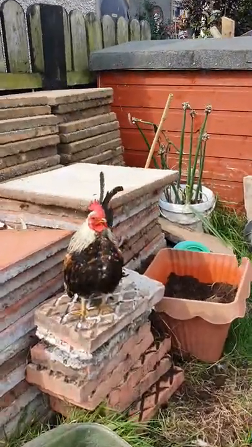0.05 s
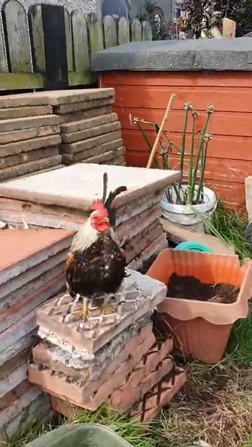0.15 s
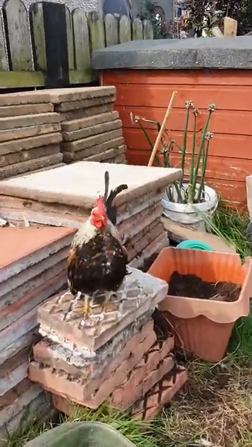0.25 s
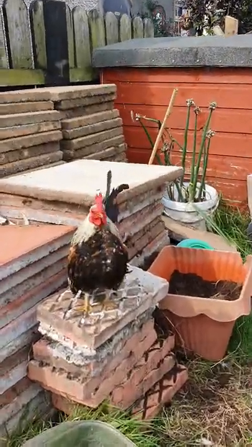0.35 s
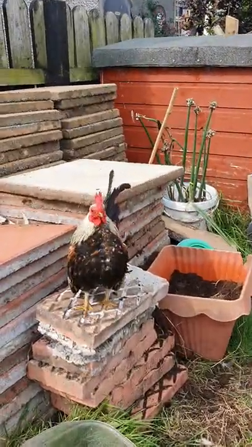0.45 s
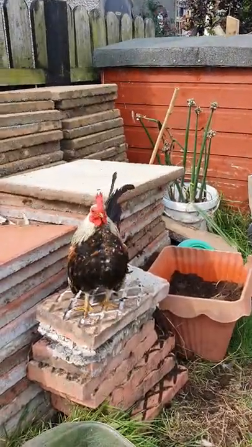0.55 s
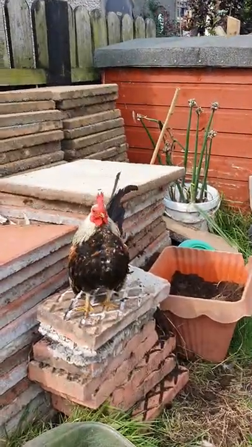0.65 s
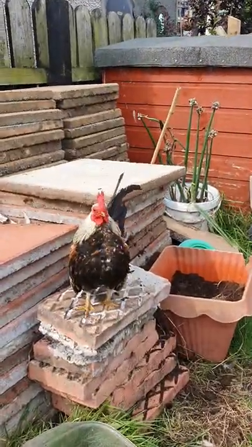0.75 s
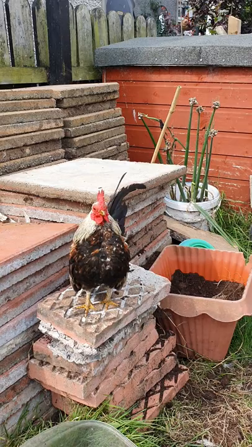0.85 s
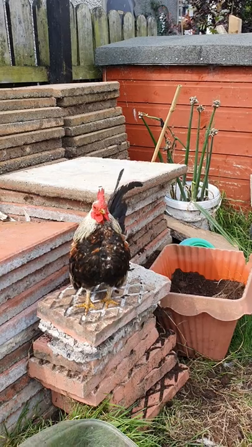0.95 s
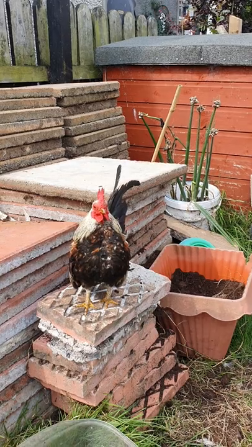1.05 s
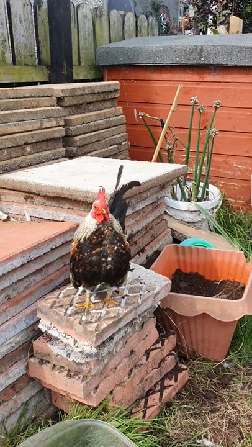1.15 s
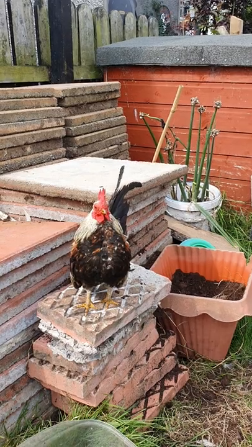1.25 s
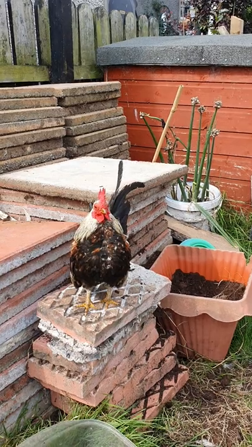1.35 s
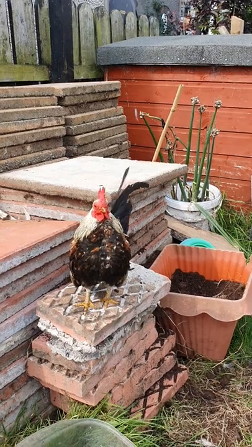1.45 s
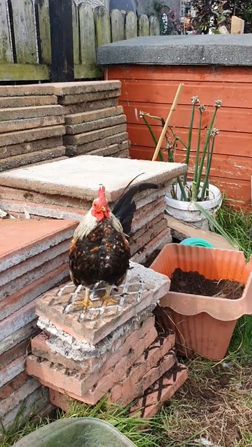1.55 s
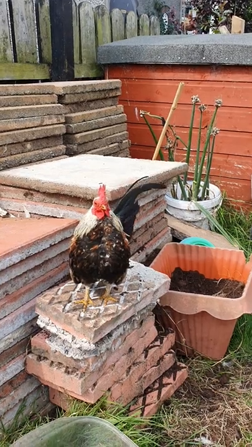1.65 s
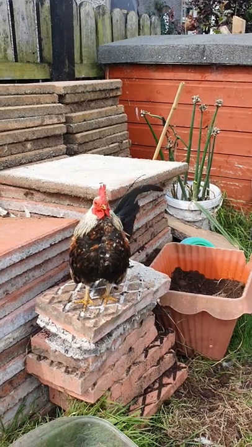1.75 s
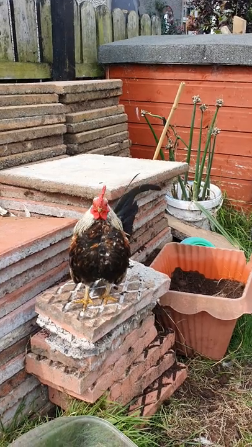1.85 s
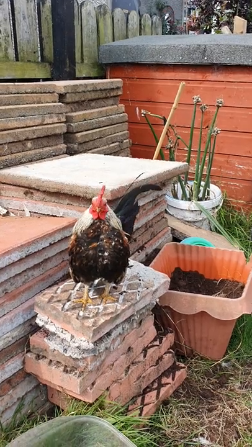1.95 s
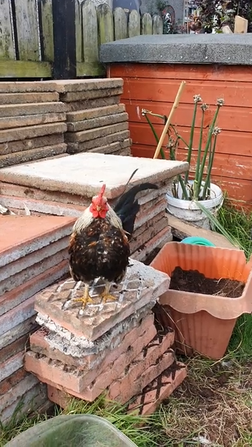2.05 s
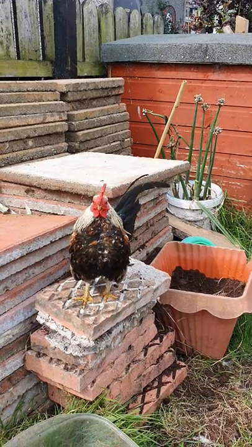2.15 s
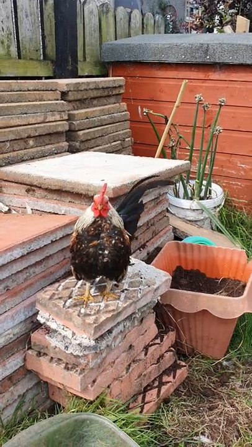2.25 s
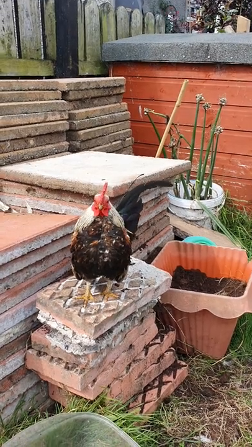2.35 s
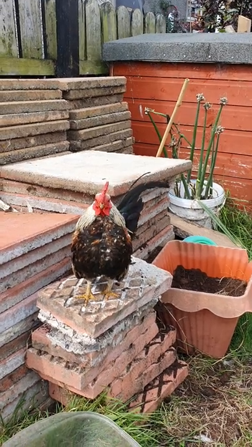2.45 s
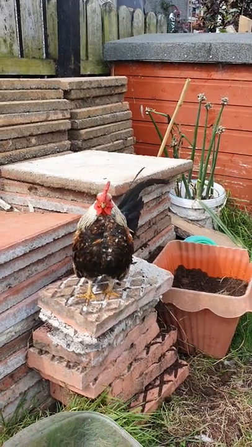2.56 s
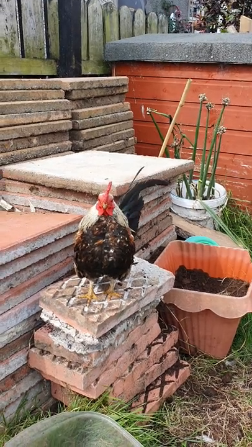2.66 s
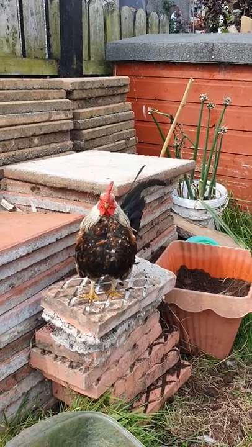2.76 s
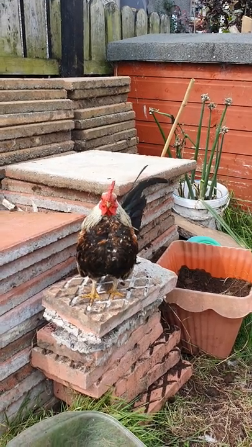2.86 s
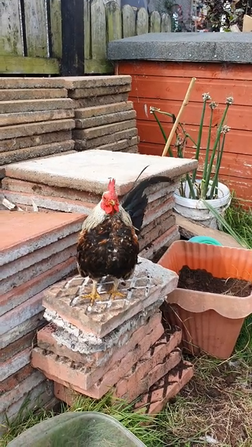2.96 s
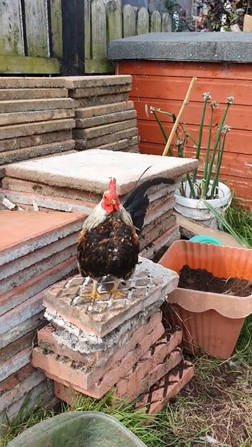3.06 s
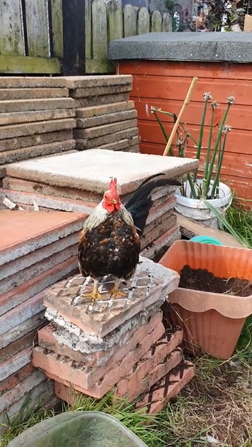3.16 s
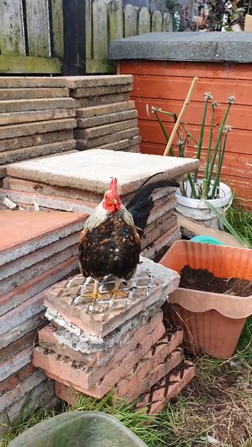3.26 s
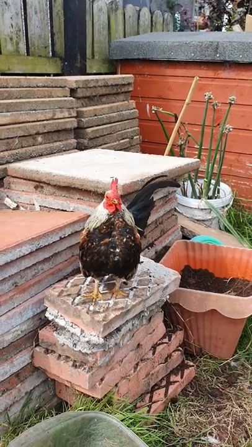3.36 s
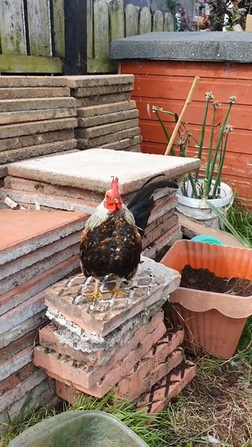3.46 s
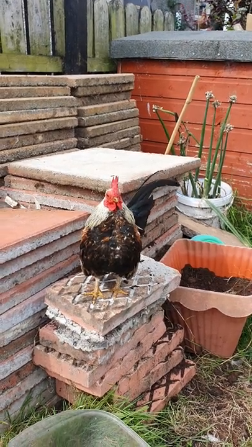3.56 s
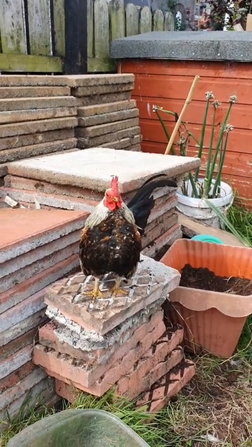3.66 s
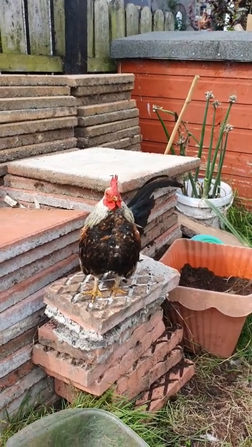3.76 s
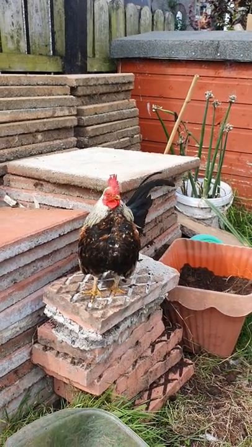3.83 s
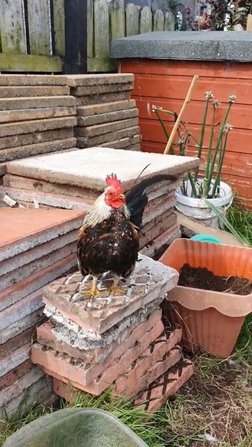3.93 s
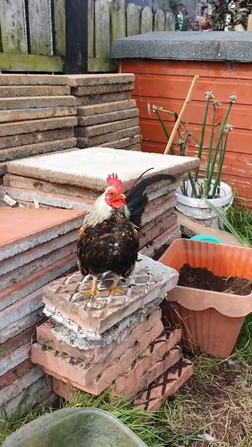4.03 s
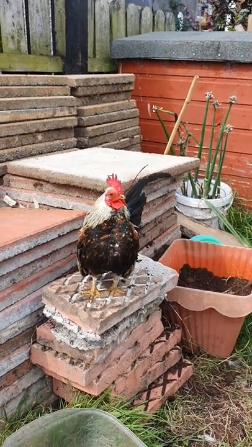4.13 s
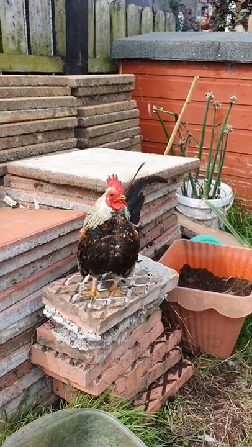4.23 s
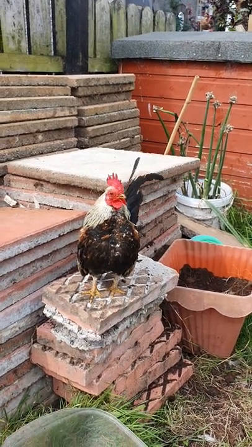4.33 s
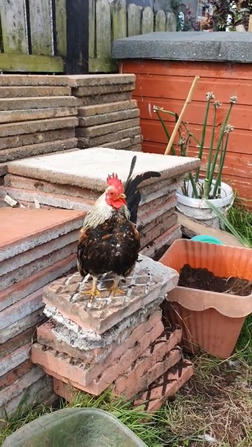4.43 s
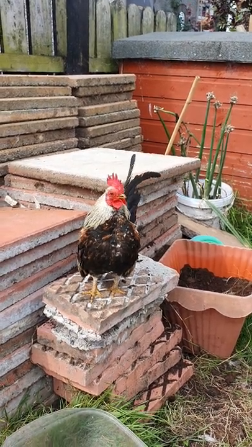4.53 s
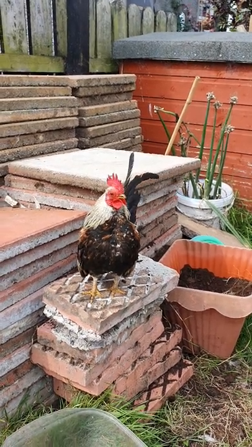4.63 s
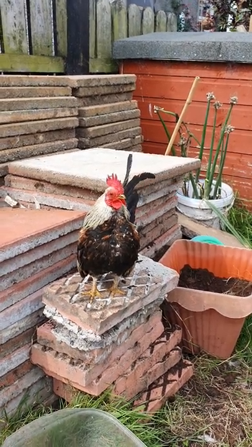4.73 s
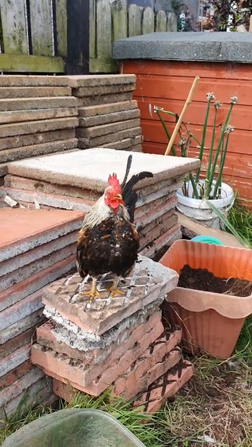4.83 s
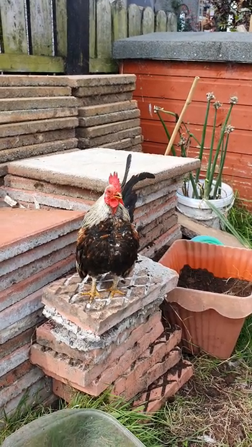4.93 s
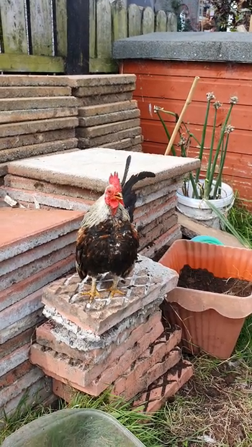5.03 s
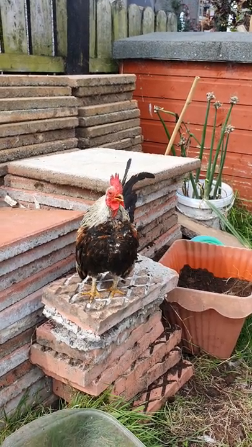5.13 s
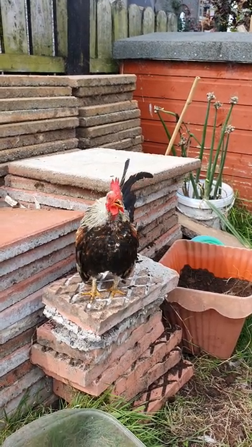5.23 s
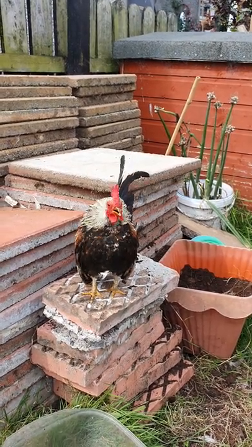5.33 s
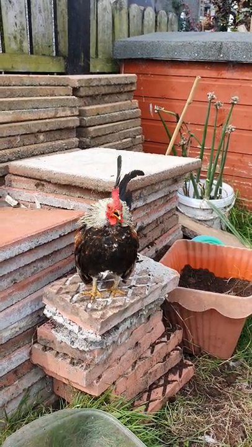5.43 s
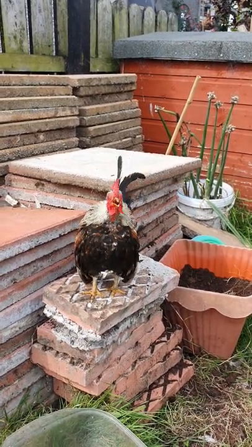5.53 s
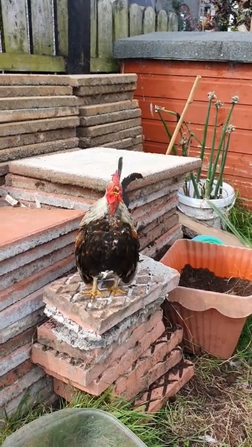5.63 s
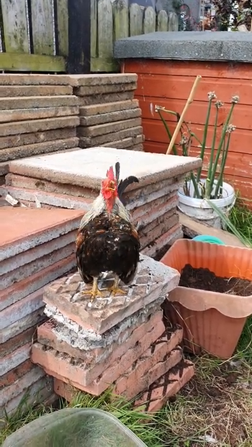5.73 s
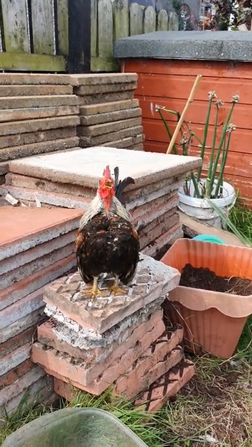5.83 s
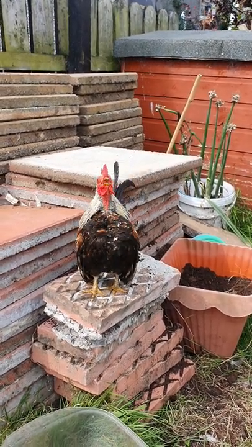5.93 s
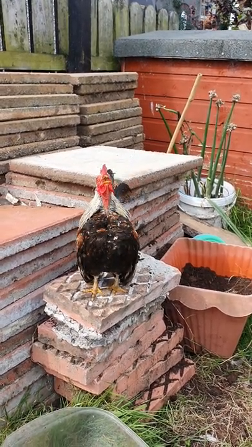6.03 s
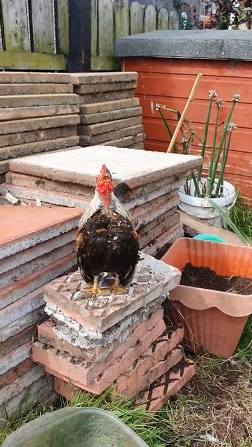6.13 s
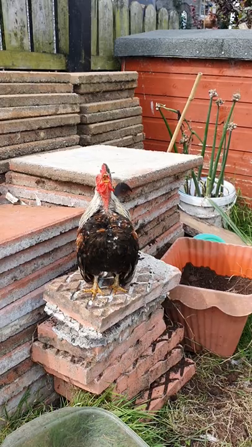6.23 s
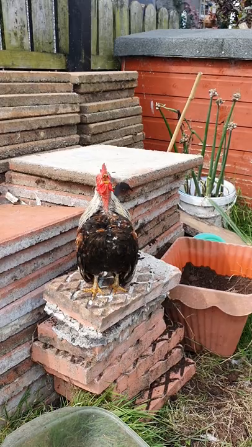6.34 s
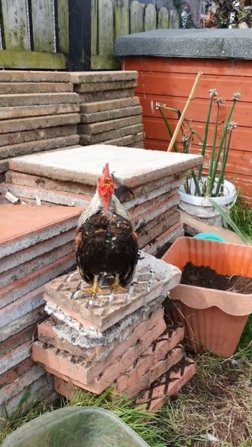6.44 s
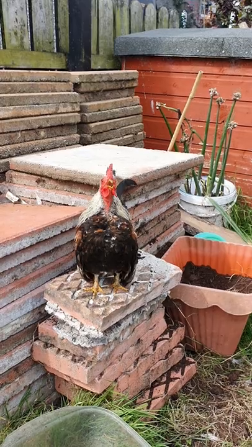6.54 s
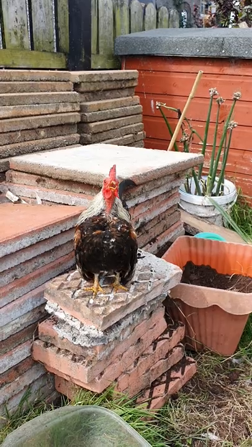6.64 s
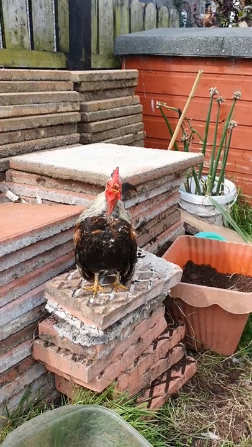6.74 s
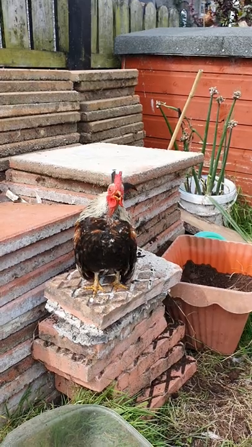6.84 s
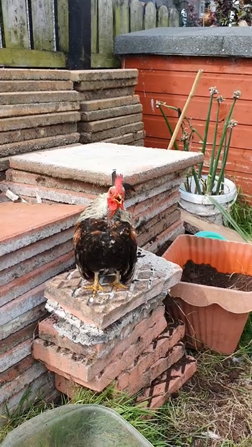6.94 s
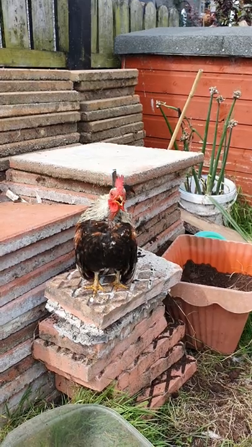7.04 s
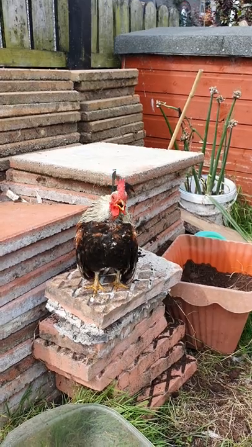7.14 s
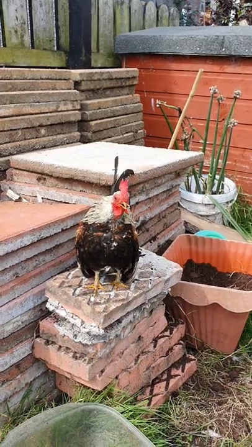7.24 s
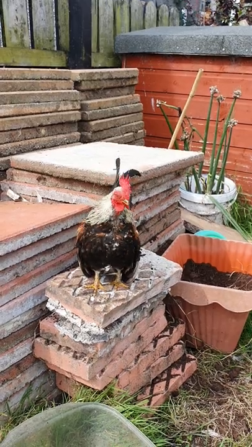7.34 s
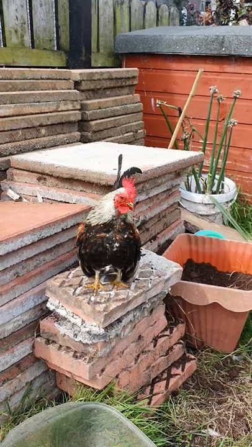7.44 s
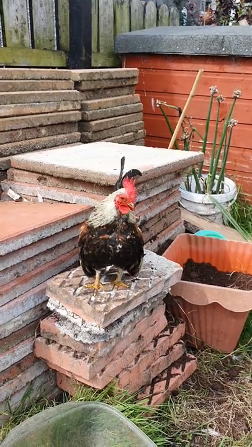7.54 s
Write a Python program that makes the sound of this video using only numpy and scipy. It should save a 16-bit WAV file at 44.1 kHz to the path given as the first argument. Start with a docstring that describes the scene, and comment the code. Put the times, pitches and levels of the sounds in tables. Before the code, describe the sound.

A bantam rooster crows at a distance, then another crows much louder and harsher close by, amid low clucking rattles, faint birdsong and garden wind.

```python
"""Two roosters in a windy garden

Two bantam roosters crow in a fenced garden, first one farther off, then one close by: pulses of the
syrinx ring a windpipe and break up into throbs and breath. A bird rattles in ringing pulses and ticks in
noise snaps; far songbirds whistle as fluttering tones. Traffic, leaves and wind are coloured stereo noise."""
import sys
import numpy as np
from scipy import signal
from scipy.fft import rfft, irfft, next_fast_len
from scipy.io import wavfile
from scipy.ndimage import uniform_filter1d

SR = 44100
rng = np.random.default_rng(int(sys.argv[2]) if len(sys.argv) > 2 else 0)


def to_wav(s):
    """Save 16-bit WAV."""
    ch = np.atleast_2d(s).T  # columns
    pcm = np.round(np.clip(ch, -1, 1) * 32767)  # PCM
    wavfile.write(sys.argv[1], SR, pcm.astype(np.int16))


N = 334534

# Effort of the near rooster, one list per syllable.
# Each row: time in seconds, level of the throat band in dB, fundamental against it in dB.
NEAR_CROW = [
    [(5.615, -96, 17), (5.625, -34, -12), (5.633, -20.5, -14), (5.677, -16, -7.5), (5.713, -12, -15),
     (5.8, -16, -12.5)],
    [(5.8, -12, -9), (5.806, -19.5, -4), (5.856, -16.5, 1), (5.904, -17, 0), (5.928, -19, -6),
     (5.944, -33, -7), (5.99, -48, -9)],
    [(6.015, -66, -0.5), (6.029, -26.5, 1.5), (6.043, -17.5, 0), (6.141, -18.5, -7.5), (6.172, -19, -0.5)],
    [(6.172, -19.5, -2), (6.236, -20, 1), (6.244, -17, -6.5), (6.36, -18.5, 1.5), (6.376, -16, -5),
     (6.454, -23, -1.5), (6.466, -18.5, -6.5), (6.54, -29.5, 1), (6.586, -55.5, 0), (6.62, -60, 3)],
    [(6.779, -38, -10.5), (6.805, -24.5, -8), (6.847, -20.5, -11), (6.975, -28, -8.5), (7.077, -24, -12.5),
     (7.141, -27, -4.5), (7.259, -32, -9.5), (7.283, -41, -7.5), (7.299, -58, -8), (7.31, -54, -14)],
]
# How alike left and right are in the traffic and leaves. Each row: frequency in Hz, likeness from -1 to 1.
LIKENESS = [(60, 0.96), (130, 0.78), (290, 1), (640, 0.68), (1410, -0.22), (3100, -0.094), (6820, 0.048),
            (15000, -0.42)]


def from_db(db):
    """Decibels to gain."""
    return 10 ** (np.asarray(db) / 20)


def rms_one(x):
    """Scale to rms 1."""
    return x / np.sqrt(np.mean(x ** 2) + 1e-20)


def in_time(rows, t):
    """Columns of a curve table at times t."""
    s, *columns = np.transpose(rows)
    return [np.interp(t, s, c) for c in columns]


def span(start_s, end_s):
    """First sample and sample times of a stretch."""
    first, last = round(start_s * SR), min(round(end_s * SR), N)
    return first, np.arange(first, last) / SR


def at_hz(points, hz):
    """Read a spectrum on a log-frequency axis."""
    f, v = np.transpose(points)
    return np.interp(np.log(np.maximum(hz, 1)), np.log(f), v)


def colour(x, spectrum):
    """Filter by a (Hz, dB) table."""
    n = next_fast_len(x.shape[-1] + 2000)
    gain = from_db(at_hz(spectrum, np.fft.rfftfreq(n, 1 / SR)))
    return irfft(rfft(x, n) * gain, n)[..., :x.shape[-1]]


def wobble(size, rate_hz):
    """Random wandering, noise low-passed at rate_hz; spread 1."""
    sos = signal.butter(2, rate_hz, fs=SR, output="sos")
    settle = 4000
    return rms_one(signal.sosfilt(sos, rng.standard_normal(size + settle))[settle:])


def evened(x, band_hz):
    """One band of x with its slow level held at rms 1."""
    band = signal.sosfiltfilt(signal.butter(4, band_hz, "band", fs=SR, output="sos"), x)
    power = uniform_filter1d(uniform_filter1d(band ** 2, size=1000), size=1000)
    return band / np.sqrt(power + 1e-12)


def shaped(t, first_db, last_db, attack, release, edge_db):
    """Level in dB of one call: attack, a slope from first to last, release."""
    release = min(release, t[-1] - t[0] - attack)
    corners = [t[0], t[0] + attack, t[-1] - release, t[-1]]
    return np.interp(t, corners, [first_db + edge_db, first_db, last_db, last_db + edge_db])


def crow(melody, syllables, harsh, overtones, throat, shrill, balance, jitter, breath_db):
    """Syrinx pulses through the windpipe; in harsh stretches the cycles wander, throb and fill with breath."""
    join_s = .004   # parts of a syllable fade into each other
    rough_middle_db, rough_top_db = 3.0, -2   # change at roughness 1
    out = np.zeros(N)
    for rows, top, gape in zip(syllables, shrill, balance):
        a, t = span(rows[0][0] - join_s, rows[-1][0] + join_s)
        size = len(t)
        pitch = in_time(melody, t)[0]
        level_db, low_db = in_time(rows, t)
        state = sum(np.outer(values, (t >= s) & (t < e)) for s, e, *values in harsh)
        rough, depth, throb_rate = uniform_filter1d(state, size=330)
        mid_db = np.linspace(*gape[:2], size) + rough_middle_db * rough
        top_db = np.linspace(*gape[2:], size) + rough_top_db * rough
        rough = rough + .09   # even the clear voice is a little rough

        # A slow second oscillator, uneven when rough; each throb also lifts the pitch.
        uneven_rate = throb_rate * (1 + .4 * rough * wobble(size, 40))
        beat = depth * np.cos(2 * np.pi * np.cumsum(uneven_rate) / SR)
        wander = jitter * rough * wobble(size, 250) + .005 * wobble(size, 45) + .036 * beat
        phase = 2 * np.pi * np.cumsum(pitch * (1 + wander)) / SR
        pulses = np.array([from_db(db) * np.sin(k * phase) for k, db in enumerate(overtones, start=1)])
        # The fundamental throbs deepest.
        fundamental = pulses[0] * (1 + beat) ** 2.2 * from_db(at_hz(throat, pitch))

        # Turbulence comes with each cycle, rings the windpipe and has a coarse grain.
        breath = from_db(breath_db) * rough * rng.standard_normal(size) * (1 + np.cos(phase))
        breath = colour(breath, [(1400, 0), (2100, -6), (2500, -3), (2880, 6), (3250, -2), (4000, 0)])
        breath = breath * from_db(1.4 * wobble(size, 120))
        tone = pulses[1:].sum(axis=0) * (1 + .4 * beat) * (1 - .45 * rough ** 2)
        source = tone + breath * (1 - beat)   # tone and breath take turns

        voice = fundamental + colour(source, throat)
        body = from_db(low_db) * evened(voice, (.8 * pitch.mean(), 1750))
        body = body + evened(voice, (1750, 3800))   # the throat band
        body = body + from_db(mid_db) * evened(voice, (3800, 7650))
        airy = source + .5 * rng.standard_normal(size)   # the top is never quite clean
        shrill_top = from_db(top_db) * evened(colour(airy, top), (7650, 15800))
        fade = np.sqrt(signal.windows.tukey(size, 4 * join_s * SR / size))
        out[a:a + size] += fade * from_db(level_db) * (body + shrill_top)
    return out


def near_rooster():
    """The close crow: a harsh voice with a hoarse last syllable, placed in the garden."""
    # Mean pitch. Each row: time in seconds, pitch in Hz.
    melody = [(5.63, 1304), (5.66, 1221), (5.7, 1182), (5.795, 1227), (5.806, 1270), (5.856, 1289),
              (5.918, 1321), (6.057, 1305), (6.15, 1210), (6.18, 1177), (6.31, 1162), (6.335, 1256),
              (6.39, 1168), (6.455, 1112), (6.482, 1229), (6.62, 1224), (6.8, 1193), (6.882, 1200),
              (6.892, 1324), (6.915, 1317), (6.97, 1308), (7.12, 1297), (7.28, 1177)]
    # Where the voice breaks up. Each row: start and end in seconds, added roughness 0-1, throb depth 0-1,
    # mean throbs per second.
    harsh = [(5.61, 5.645, .6, .3, 130), (5.645, 5.67, .35, .2, 130), (5.67, 5.8, .8, .45, 140),
             (5.915, 5.99, .7, .4, 130), (6.058, 6.172, .85, .5, 130), (6.172, 6.262, .04, .15, 36),
             (6.262, 6.276, .8, .3, 130), (6.292, 6.302, .8, .3, 130), (6.325, 6.348, .8, .3, 130),
             (6.397, 6.413, .8, .3, 130), (6.458, 6.48, .8, .3, 130), (6.495, 6.505, .5, .3, 130),
             (6.545, 6.62, .5, .3, 130), (6.76, 6.888, 1, .4, 80), (6.918, 7.16, .78, .25, 100),
             (7.16, 7.31, .95, .3, 100)]
    # Strength in dB of the syrinx partials, fundamental first.
    overtones = [-1, -4, -9, -14, -3, -4, -3, 4.5, -2.5, 4, -9.5, 9.5, -6.5]
    # Windpipe and beak. Each row: frequency in Hz, gain in dB.
    throat = [(500, -39), (900, -33), (1200, -30), (1800, -10.5), (2300, 1.5), (2650, 3.5), (2950, 6.5),
              (3300, -1.5), (3650, -17.5), (4200, -20), (5000, -43), (6200, -21.5), (7400, -47)]
    # Colour of the shrill top, one list per syllable. Each row: frequency in Hz, gain in dB.
    shrill = [
        [(4410, -45.5), (7500, -8), (10300, 5), (11700, -34), (13300, -2), (14700, -48), (15500, -35)],
        [(4410, -41.5), (7500, -4), (9620, -14.5), (10000, -6.5), (12000, -3.5), (15500, -10)],
        [(4410, -73), (7500, -62), (7990, -5), (9680, -20), (11500, 4.5), (14200, -28), (15500, -91)],
        [(4410, -56), (7500, -27.5), (8020, -0.5), (10500, -22), (11600, 6), (14200, -28.5), (15500, -16)],
        [(4410, -26), (7500, 2.5), (9620, -13.5), (10300, -2.5), (12900, -5.5), (14500, -22), (15500, -34)],
    ]
    # Balance against the throat band as the beak moves, before roughness changes it. Each row, one
    # syllable: middle overtones first and last in dB, shrill top first and last in dB.
    balance = [(-25, -29.5, -23, -27), (-18.5, -37.5, -19.5, -31.5), (-15.5, -20.5, -22, -16),
               (-21, -20.5, -11, -24), (-34.5, -19, -27, -21.5)]
    # Direction. Each row: frequency in Hz, phase by which left leads in radians.
    lead = [(0, -3), (1380, 1.3), (2240, 0.37), (3880, 3.5), (5170, 4.5), (6290, 12), (6980, 1),
            (7670, 24.5), (8180, 25.5), (9040, 35), (9820, 21.5), (11600, 24), (14600, 27.5), (15300, 17.5)]
    # Direction. Each row: frequency in Hz, left minus right in dB.
    pan = [(60, -7), (110, -9.5), (200, -11), (380, -4.5), (700, 7), (1290, -0.5), (2380, -3), (4400, -1.5),
           (8120, 6.5), (15000, -4)]
    voice = crow(melody, NEAR_CROW, harsh, overtones, throat, shrill, balance, jitter=.052, breath_db=-1)
    return placed(voice + hoarse(), lead, pan, wet_db=0.5)


def hoarse():
    """Coarse low noise that follows the effort of the near rooster's last syllable."""
    out, rows = np.zeros(N), NEAR_CROW[-1]
    a, t = span(rows[0][0], rows[-1][0])
    rasp = evened(rng.standard_normal(len(t)), (660, 1080))
    level_db = in_time(rows, t)[0] - 28.5 + 2.2 * wobble(len(t), 110)   # far below the throat band
    out[a:a + len(t)] = from_db(level_db) * rasp
    return out


def far_rooster():
    """The farther crow: the same kind of voice with slow deep throbs and stronger echoes."""
    # Mean pitch. Each row: time in seconds, pitch in Hz.
    melody = [(.345, 1120), (.38, 1111), (.6, 1101), (.7, 1052), (.72, 1066), (.742, 1220), (.76, 1225),
              (.785, 1204), (.797, 1057), (.87, 1070), (.92, 1111), (1.04, 1083), (1.09, 1127),
              (1.19, 1079), (1.28, 1078), (1.31, 1153), (1.48, 1149), (1.55, 1104), (1.6, 1124),
              (1.75, 1149), (1.81, 1104), (1.882, 1062), (1.885, 763), (1.934, 813), (1.96, 681)]
    # Effort, one list per syllable. Each row: time in seconds, level of the throat band in dB,
    # fundamental against it in dB.
    syllables = [
        [(0.352, -46, -22), (0.36, -36.5, -30), (0.372, -29.5, -7), (0.406, -20, -3.5), (0.47, -24, -7),
         (0.586, -25.5, -7), (0.606, -40.5, -7.5), (0.66, -58, -7)],
        [(0.709, -30.5, -9), (0.723, -29.5, -11), (0.731, -23, -2.5), (0.739, -25, 10), (0.785, -24.5, 7.5),
         (0.796, -28, 1)],
        [(0.796, -27.5, 0), (0.798, -30.5, -7), (0.87, -54.5, -3.5)],
        [(0.895, -60, 12), (0.905, -34, -9), (0.915, -26.5, -3.5), (1.005, -25, -3), (1.011, -27.5, -10),
         (1.023, -23.5, -3), (1.045, -28, -11), (1.068, -47, -8)],
        [(1.068, -42, -9), (1.084, -25, -8.5), (1.12, -25, 6.5), (1.128, -25, -5), (1.272, -27.5, -5),
         (1.316, -30.5, -14), (1.326, -44, -13), (1.36, -51, -3)],
        [(1.471, -41.5, -14.5), (1.487, -25.5, -11), (1.535, -26, 0), (1.543, -25.5, -6.5),
         (1.633, -25.5, -0.5), (1.687, -38.5, -17), (1.7, -31, -10)],
        [(1.7, -34.5, -10), (1.73, -32.5, -24), (1.748, -28.5, -11.5), (1.802, -27, -2.5), (1.816, -27, -7),
         (1.828, -34, 4), (1.874, -31, 1.5), (1.882, -32.5, -1.5)],
        [(1.884, -31.5, -9.5), (1.952, -32, -19), (1.958, -38, -2.5), (1.99, -48.5, -8)],
    ]
    # Where the voice breaks up. Each row: start and end in seconds, added roughness 0-1, throb depth 0-1,
    # mean throbs per second.
    harsh = [(.34, .45, .36, .5, 44), (.45, .66, .5, .75, 42), (.70, .728, .5, .2, 60),
             (.728, .792, .12, .1, 60), (.792, .87, .6, .3, 60), (.89, 1.035, .1, .85, 44.5),
             (1.035, 1.08, .4, .6, 35), (1.08, 1.2, .16, .85, 42), (1.2, 1.36, .38, .6, 46),
             (1.46, 1.525, .7, .4, 60), (1.59, 1.66, .45, .7, 40), (1.66, 1.79, .65, .5, 55),
             (1.868, 1.886, .8, .3, 60), (1.94, 1.99, .5, .3, 60)]
    # Strength in dB of the syrinx partials, fundamental first.
    overtones = [19, -5, -8, -13.5, -4, -8.5, -2, -8.5, -8.5, -2, -11, 3, 1.5, -5.5, -6]
    # Windpipe and beak. Each row: frequency in Hz, gain in dB.
    throat = [(500, -48), (1100, 3), (1700, 2), (2250, 0), (2900, 8), (3300, -1.5), (3800, -14.5),
              (4400, 1.5), (4950, -13), (5600, -11), (6500, -21.5), (7600, -56)]
    # Colour of the shrill top, one list per syllable. Each row: frequency in Hz, gain in dB.
    shrill = [
        [(4410, -43), (7500, -4), (8420, 13.5), (10800, 6.5), (12200, -18), (13600, -9), (15500, -30)],
        [(4410, -43.5), (7500, -11), (10100, 9.5), (11500, -14.5), (11800, -66.5), (14000, -6), (15500, -46)],
        [(4410, -37.5), (7500, -0.5), (11600, -10.5), (14000, -18), (15500, -35)],
        [(4410, -68), (7500, -38), (8440, -2), (10600, 7), (11800, -13), (14400, -8), (15500, -52)],
        [(4410, -88), (7500, -55), (10000, 13), (11500, -19), (12100, -12), (14000, -10), (15500, -25)],
        [(4410, -123), (7500, -93), (8550, -17), (9620, 10), (11500, -23), (13800, -19.5), (15500, -29)],
        [(4410, -53), (7500, -14), (8290, -21), (10000, 7), (11800, -36), (13400, -26), (15500, -34)],
        [(4410, -66), (7500, -21.5), (9650, -8), (10700, -8), (11500, -23), (15500, -22)],
    ]
    # Balance against the throat band as the beak moves, before roughness changes it. Each row, one
    # syllable: middle overtones first and last in dB, shrill top first and last in dB.
    balance = [(-17, -15, -23.5, -25), (-8, -10.5, -18, -19), (2.5, -2.5, -17.5, -18),
               (-10, -4.5, -25.5, -23.5), (-6, -5.5, -23, -24), (-12, -11.5, -18, -20),
               (-19, -8, -24, -14.5), (-10.5, -14.5, -16, -21)]
    # Direction. Each row: frequency in Hz, phase by which left leads in radians.
    lead = [(0, -3), (600, -0.2), (1980, -2), (2930, -1.06), (3700, -2.5), (4740, -2.5), (5510, -3.5),
            (6980, -2), (7410, -14), (8100, 0), (9990, -2), (13000, -1.5), (14500, -9.5), (15300, -5)]
    # Direction. Each row: frequency in Hz, left minus right in dB.
    pan = [(60, -11), (110, -6), (200, -11), (380, 0), (700, -8), (1290, -2.5), (2380, -4.5), (4400, 1),
           (8120, 2), (15000, 5)]
    voice = crow(melody, syllables, harsh, overtones, throat, shrill, balance, jitter=.05, breath_db=-5)
    return placed(voice, lead, pan, wet_db=3)


def swell(since, rise):
    """Envelope of one ringing pulse: up to 1 after the rise time, then dying away."""
    x = np.maximum(since, 0) / rise
    return x * np.exp(1 - x)


def rattle():
    """Slow separate pulses, each ringing the lower resonance first and the upper one just after."""
    # Each row: start and length in seconds, first and last level in dB, upper resonance in Hz at middle
    # effort, pulses per second, lower resonance in dB against the upper at middle effort, treble rasp in
    # dB against the upper.
    calls = [(0.0, 0.05, -48, -55, 2400, 64, 1, -24), (.05, 0.081, -46, -36, 2580, 83.8, -5, -10.5),
             (.25, 0.076, -44, -35.5, 2360, 100, -9, -9), (2.431, .33, -53, -42, 2150, 66, -1.5, -12.5),
             (3.019, 0.062, -41, -37.5, 2486, 72.2, -10.5, -10),
             (3.167, 0.06, -43.5, -38.5, 2380, 66, -2.5, -12),
             (3.642, 0.15, -37.5, -50, 2167, 68, -3.5, -14), (3.876, 0.06, -40, -34, 2190, 74, -6, -13),
             (4.387, 0.14, -46.5, -41, 2280, 60, -0.5, -20.5),
             (4.644, 0.056, -45.5, -43.5, 2220, 79, 1.5, -18.5),
             (5.039, 0.16, -40, -42.5, 2250, 66.1, -3, -24),
             (5.281, 0.068, -35, -32.5, 2308, 71, -16, -27.5),
             (6.727, 0.063, -45, -49, 2280, 67.7, -13, -28),
             (7.329, 0.062, -42.5, -46.5, 2260, 64, -13, -20), (7.49, 0.046, -44, -47, 2320, 68, -24, -22)]
    low_hz, scrape_db = 1671, -9
    hz_per_db, low_per_db = 14, -0.3   # with effort the upper resonance climbs, the lower one falls back
    scrape_colour = [(900, -12), (1500, 13), (2600, 6), (3300, 2.5), (3800, -45.0)]
    rasp_colour = [(2900, -22.5), (3400, -13), (3750, 1), (4000, 0), (4300, 0.5), (4800, -0.5),
                   (5400, 0.5), (6500, -12.5), (7300, -26), (10000, -45)]
    out = np.zeros(N)
    for s, length, first_db, last_db, upper_hz, rate, low_db, rasp_db in calls:
        a, t = span(s, s + length)
        size = len(t)
        level_db = shaped(t, first_db, last_db, attack=0.0077, release=0.027, edge_db=-20)
        effort_db = np.clip(level_db, min(first_db, last_db), 0) - (first_db + last_db) / 2
        upper_hz = upper_hz + hz_per_db * effort_db
        low_db = low_db + low_per_db * effort_db
        # Seconds since the last pulse; the pulses are slightly uneven.
        since = (((t - t[0] - .004) * rate + .04 * wobble(size, 20)) % 1) / rate
        lower = swell(since, .0013) * np.sin(2 * np.pi * low_hz * t)
        upper_phase = 2 * np.pi * np.cumsum(upper_hz * (1 + .05 * wobble(size, 200))) / SR
        upper = swell(since - .0012, .0016) * np.sin(upper_phase)
        noise = swell(since - .0005, 0.0045) * rng.standard_normal(size)
        scrape, rasp = colour(noise, scrape_colour), colour(noise, rasp_colour)
        mix = from_db(low_db) * rms_one(lower) + rms_one(upper)
        mix = mix + from_db(scrape_db) * rms_one(scrape) + from_db(rasp_db) * rms_one(rasp)
        uneven_level = from_db(level_db + 1.8 * wobble(size, 68))
        out[a:a + size] += uneven_level * mix * signal.windows.tukey(size, .06)
    return out


def ticks():
    """Beak ticks: short bright noise snaps that die away."""
    # Each row: time in seconds, peak level in dB before placing.
    snaps = [(2.4054, -35.5), (3.003, -31.5), (3.6248, -30.5), (3.7907, -41), (4.368, -33), (5.022, -40),
             (6.7073, -42), (7.3112, -40)]
    out, size = np.zeros(N), 600
    fade = np.exp(-np.arange(size) / SR / 0.0062)
    bright = [(1500, -5.5), (2600, 2.5), (6500, -12.5), (7500, -36), (10500, -37)]
    for s, peak_db in snaps:
        snap = colour(fade * rng.standard_normal(size), bright)
        a = round(s * SR)
        out[a:a + size] += from_db(peak_db) * snap / np.abs(snap).max()
    return out


def songbirds():
    """Whistles with a fluttering pitch, blurred by leaves and distance and broken into quick beads."""
    # Each row: start and length in seconds, first and last mean pitch in Hz, first and last level in dB,
    # spread of the pitch flutter in Hz.
    notes = [(0.327, 0.053, 2030, 3170, -57, -31, 40), (1.988, 0.12, 2360, 2860, -45.5, -54, 261),
             (2.144, 0.12, 2960, 3050, -56.5, -60.5, 400), (2.142, .13, 5800, 5500, -58, -59.5, 420),
             (2.342, 0.12, 2700, 2625, -64, -60, 35), (2.759, 0.15, 2730, 2630, -54, -56, 110),
             (2.965, 0.087, 2800, 3130, -54, -50, 240), (3.383, 0.28, 4770, 4370, -66, -62.5, 230),
             (3.788, 0.028, 2870, 2870, -51, -52, 110), (4.011, 0.067, 4580, 4620, -54, -55, 230),
             (4.098, 0.063, 2100, 2950, -51, -53, 160), (4.158, 0.2, 2730, 3640, -63, -62, 35),
             (4.366, .11, 4400, 4420, -56, -62, 230), (4.821, 0.043, 3430, 3430, -51, -62, 400),
             (4.823, 0.041, 4670, 4730, -44, -60, 230), (7.534, 0.028, 4650, 4630, -53.5, -58, 232)]
    trill_per_s, trill_db = 90, 5.5
    out = np.zeros(N)
    for s, length, first_hz, last_hz, first_db, last_db, spread in notes:
        a, t = span(s, s + length)
        size = len(t)
        pitch = np.linspace(first_hz, last_hz, size)
        level_db = shaped(t, first_db, last_db, attack=0.0095, release=.015, edge_db=-11)
        phase = 2 * np.pi * np.cumsum(pitch + spread * wobble(size, 410)) / SR
        blur_db = 2.45 * wobble(size, 64)
        beads_db = trill_db * np.sin(2 * np.pi * trill_per_s * t + wobble(size, 31))
        whistle = np.sqrt(2) * np.sin(phase) * signal.windows.tukey(size, .2)
        out[a:a + size] += from_db(level_db + blur_db + beads_db) * whistle
    return out


def placed(x, lead, pan, wet_db):
    """Direct sound with phase and level differences between the microphones, plus dull garden echoes."""
    # Fence and shed. Each row: delay in seconds before scatter, level in dB before wet_db.
    reflections = [(0.01, -7.5), (0.024, -19), (.041, -22), (.062, -37.5), (0.089, -28.5)]
    n = next_fast_len(N + 8000)
    hz, sound = np.fft.rfftfreq(n, 1 / SR), rfft(x, n)
    half = from_db(at_hz(pan, hz) / 2) * np.exp(.5j * np.interp(hz, *np.transpose(lead)))
    direct = np.array([half, 1 / half])
    direct = direct / np.abs(direct.mean(axis=0)).clip(.45)   # keeps the colour of the sum, save deep dips
    paths = np.zeros((2, n))
    for delay, level_db in reflections:
        scatter = delay * rng.uniform(0.92, 1.2, (2, 4))   # each surface scatters into four paths a side
        np.add.at(paths, ([[0], [1]], (scatter * SR).astype(int)), from_db(level_db + wet_db) / 2)
    echoes = rfft(paths) / (1 + (hz / 4000) ** 2)
    return irfft(sound * (direct + echoes), n)[:, :N]


def wide_noise(spectrum, likeness, lump_hz, lump_db):
    """Stereo noise, alike in both channels as far as likeness says, in lumps; rms 1."""
    n = next_fast_len(N)
    hz = np.fft.rfftfreq(n, 1 / SR)
    alike = np.clip(at_hz(likeness, hz), -1, 1)
    mid, side = rfft(rng.standard_normal((2, n))) * from_db(at_hz(spectrum, hz))
    pair = irfft(np.sqrt(1 + alike) * mid + np.sqrt(1 - alike) * side * [[1], [-1]], n)[:, :N]
    return rms_one(pair * from_db(lump_db * wobble(N, lump_hz)))


def gusting(t, column, calm_db):
    """Gain of the wind: the breeze, and above it gusts that rise fast and fall more slowly."""
    # Each row: time of the peak in seconds, rumble in dB, upper buffet in dB.
    peaks = np.array([(0.746, -37, -33.5), (.8, -44, -51), (.84, -38.5, -37.5), (1.14, -41, -50),
                      (1.24, -39, -46), (1.394, -28, -41.5), (1.75, -41.5, -58), (1.88, -45, -55),
                      (2.45, -40, -54), (2.62, -35.5, -47), (2.68, -35.5, -50), (2.75, -39, -49),
                      (2.89, -35, -44.5), (3.0, -31.5, -40.5), (3.09, -30.5, -42), (3.19, -26, -47),
                      (3.38, -35.5, -47), (3.468, -29, -31), (3.51, -31.5, -48), (3.608, -38, -35.5),
                      (3.84, -36.5, -45), (3.92, -22.5, -35), (3.99, -26.5, -40), (4.5, -46, -49),
                      (4.61, -38, -42), (4.82, -41, -48), (4.941, -42, -47), (5.18, -54, -43.5),
                      (5.68, -46, -52.5)])
    rise_db_per_s, fall_db_per_s = 352, 251.5
    coarse = t[::100]
    s, peak_db = peaks[:, [0]], peaks[:, [column]]
    gust_db = peak_db + np.minimum(rise_db_per_s * (coarse - s), fall_db_per_s * (s - coarse))
    return from_db(np.maximum(calm_db, np.interp(t, coarse, gust_db.max(axis=0))))


def wind(t):
    """Wind on the microphones: deep rumble and a higher buffet, mostly unlike in the two channels."""
    # Breeze between the gusts. Each row: time in seconds, rumble in dB, upper buffet in dB.
    breeze = [(0, -64, -72), (.17, -71, -78), (.38, -49, -57), (.66, -59, -73), (.95, -53.5, -62),
              (1.3, -47, -52), (1.5, -70, -67), (1.78, -52, -63), (2.1, -56.5, -65.5), (2.36, -54.5, -64.5),
              (2.6, -42.5, -52.5), (3.3, -44.5, -52), (3.75, -48.5, -54.5), (4.3, -53, -54),
              (4.7, -51, -50.5), (5.4, -53, -53), (5.9, -58, -62), (6.9, -60, -65.5), (7.59, -58, -68)]
    # Colour of the rumble. Each row: frequency in Hz, relative density in dB per Hz.
    rumble_colour = [(25, -8.5), (55, 12), (110, 10), (200, -33), (600, -77.5)]
    # Colour of the buffet. Each row: frequency in Hz, relative density in dB per Hz.
    buffet_colour = [(40, -56), (90, -15.5), (150, 5), (400, -6.5), (700, -46.5), (1500, -82.5)]
    # Each row: frequency in Hz, left-right likeness from -1 to 1.
    wind_likeness = [(30, 1), (100, 0.24), (400, 0.34)]
    rumble_db, buffet_db = in_time(breeze, t)
    rumble = gusting(t, column=1, calm_db=rumble_db) * wide_noise(rumble_colour, wind_likeness, 18.7, 2.5)
    buffet = gusting(t, column=2, calm_db=buffet_db) * wide_noise(buffet_colour, wind_likeness, 25, 3.9)
    return rumble * from_db([[-1.5], [1.5]]) + buffet   # the rumble leans to the right


def traffic(t):
    """Distant traffic: a low hum of noise that rises and falls."""
    # Each row: time in seconds, level in dB.
    passing = [(0.0, -58.5), (0.69, -57), (0.74, -48), (0.91, -58), (1.81, -53.5), (1.92, -52),
               (2.15, -59.5), (3.63, -49.5), (4.29, -50.5), (4.63, -46), (6.78, -59.5), (7.25, -53),
               (7.37, -62.5), (7.59, -60)]
    # Each row: frequency in Hz, relative density in dB per Hz.
    hum_colour = [(120, -53), (250, -10), (400, -3.5), (800, -0.5), (1200, -3), (1600, -16), (2500, -45),
                  (5000, -69)]
    return from_db(in_time(passing, t)[0]) * wide_noise(hum_colour, LIKENESS, 1.2, 0.93)


def leaves(t):
    """Rustling leaves and far birds, merged into one bed of noise."""
    # Each row: time in seconds, level in dB before a lift of 2.5 dB.
    rustle = [(0, -52), (.2, -62), (.68, -52.5), (1.42, -53.5), (2.24, -61.5), (2.9, -60.5), (3.3, -60.5),
              (3.5, -58.5), (4.25, -57.5), (4.75, -60), (5.25, -64), (5.55, -64), (6.68, -59.5),
              (7.43, -67), (7.59, -61.5)]
    # Each row: frequency in Hz, relative density in dB per Hz.
    leaf_colour = [(400, -55.5), (900, -15.5), (1500, 0), (2300, -2), (3300, -5), (3700, -9), (4500, -8.5),
                   (6500, -18), (7200, -31), (10000, -29), (15500, -32.5)]
    return from_db(in_time(rustle, t)[0] + 2.5) * wide_noise(leaf_colour, LIKENESS, 6, 1.5)


def scene():
    """Roosters, other birds and the surroundings."""
    t = np.arange(N) / SR
    roosters = near_rooster() + far_rooster()
    bird_lead = [(0, -15.0), (2000, 1.0), (8000, -8.5)]   # Hz, radians
    bird_pan = [(1000, -2.0), (8000, -5)]   # Hz, dB
    birds = placed(rattle() + ticks() + songbirds(), bird_lead, bird_pan, wet_db=3.7)
    return roosters + birds + wind(t) + traffic(t) + leaves(t)


def record(dry):
    """Faint microphone self-noise is added, the loudest peaks are rounded, the top is cut steeply."""
    hiss_db, cutoff_hz = -87, 15760
    dry = dry + from_db(hiss_db) * rng.standard_normal(dry.shape)
    over = np.maximum(np.abs(dry) - .7, 0)
    rounded = dry - np.sign(dry) * (over - .28 * np.tanh(over / .28))
    return signal.sosfilt(signal.cheby2(14, 75, cutoff_hz, fs=SR, output="sos"), rounded)


dry = scene()
out = record(dry)
to_wav(out)
```